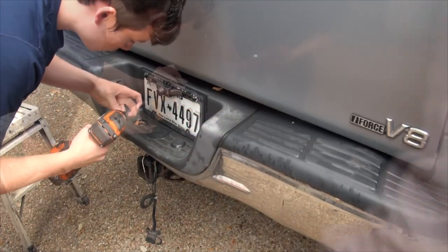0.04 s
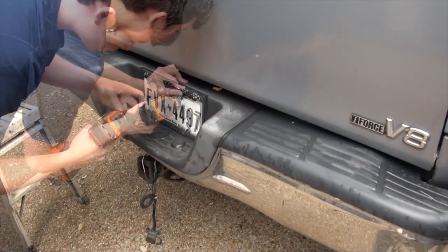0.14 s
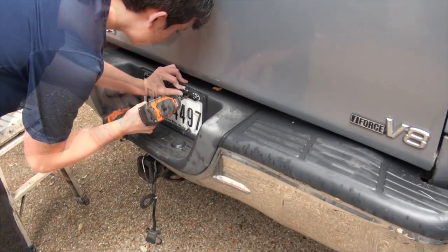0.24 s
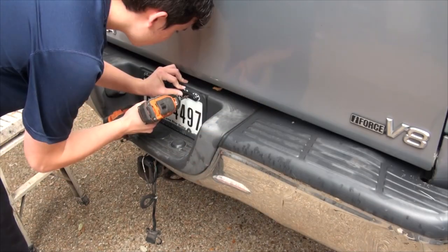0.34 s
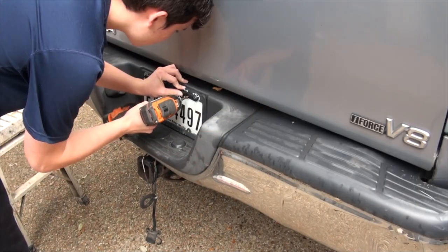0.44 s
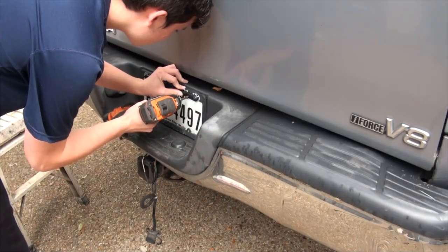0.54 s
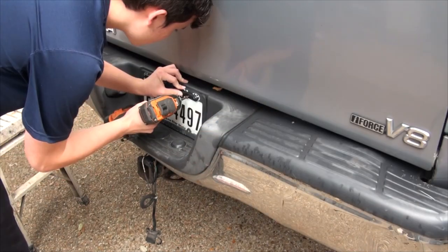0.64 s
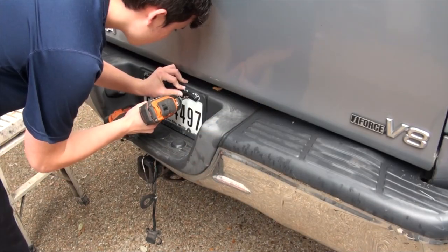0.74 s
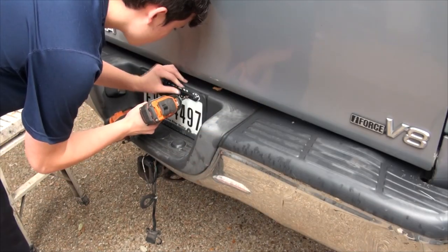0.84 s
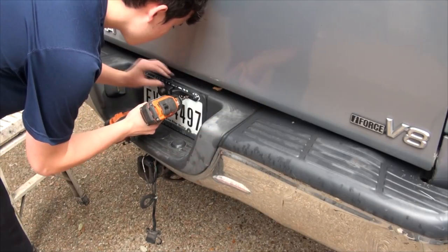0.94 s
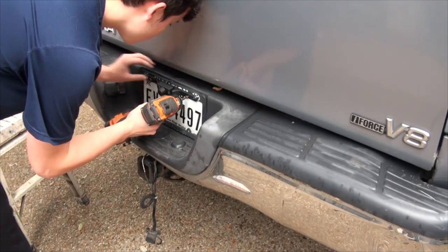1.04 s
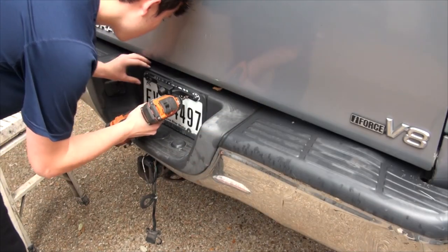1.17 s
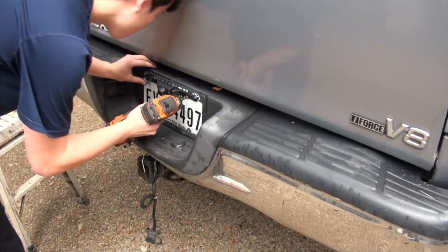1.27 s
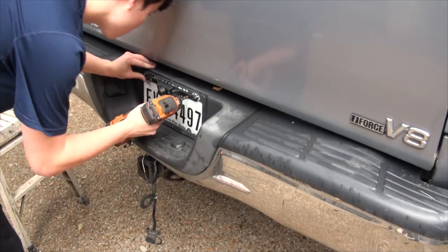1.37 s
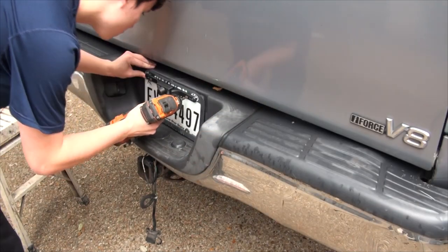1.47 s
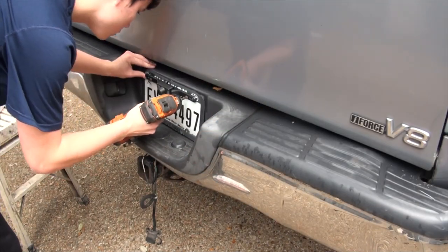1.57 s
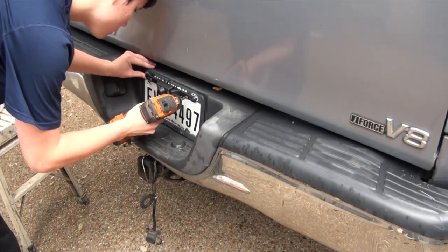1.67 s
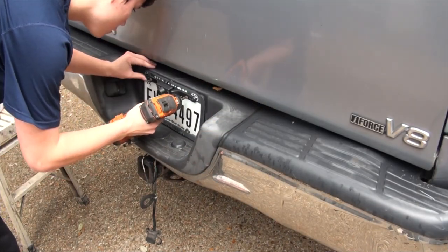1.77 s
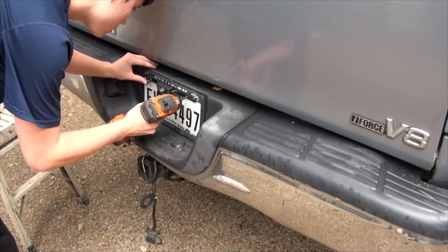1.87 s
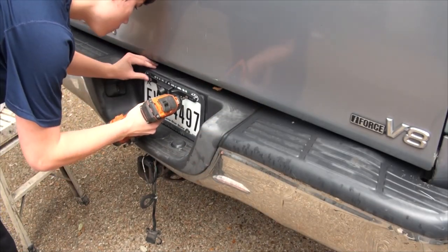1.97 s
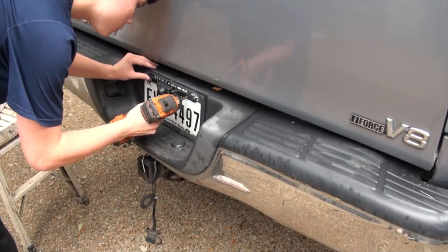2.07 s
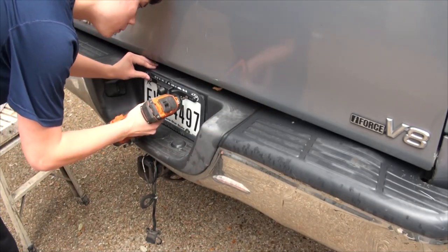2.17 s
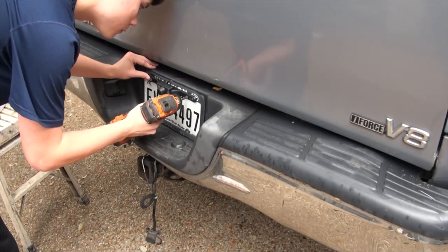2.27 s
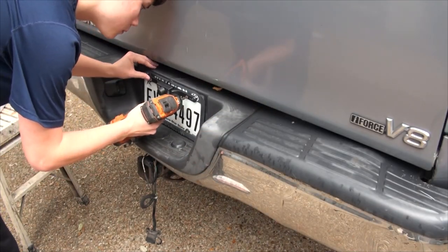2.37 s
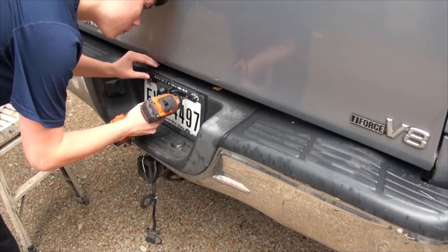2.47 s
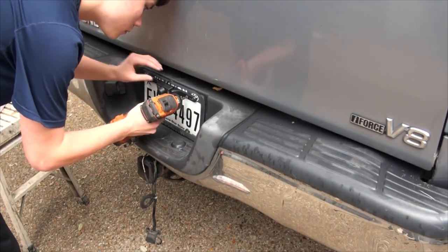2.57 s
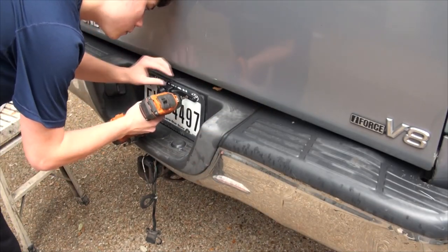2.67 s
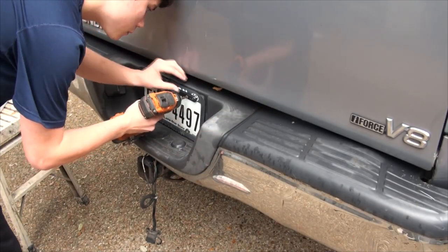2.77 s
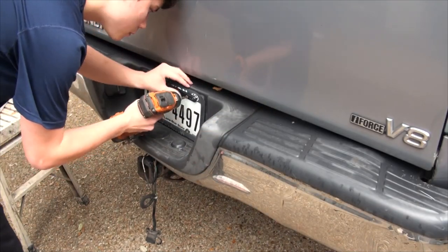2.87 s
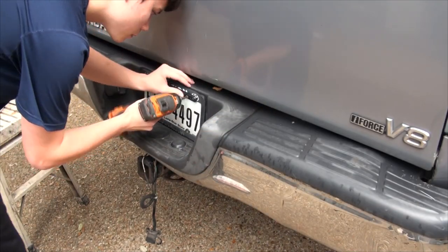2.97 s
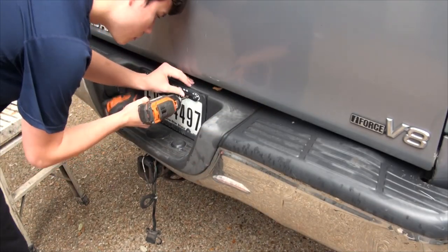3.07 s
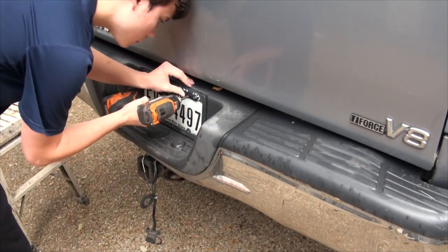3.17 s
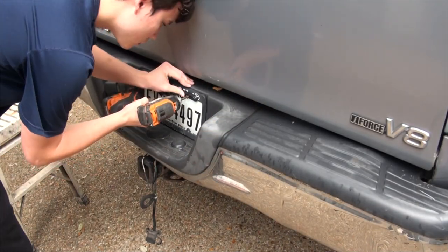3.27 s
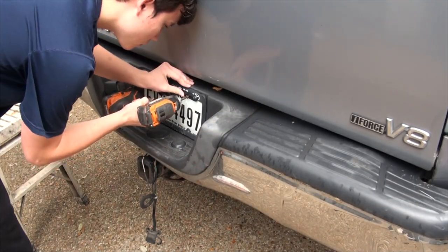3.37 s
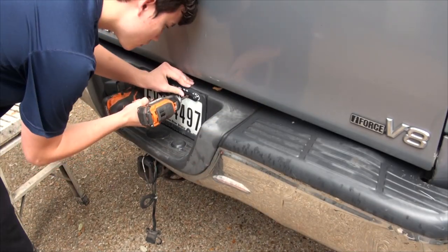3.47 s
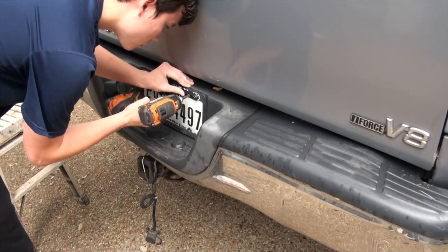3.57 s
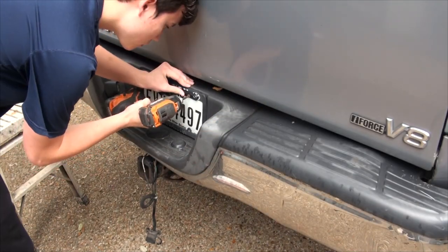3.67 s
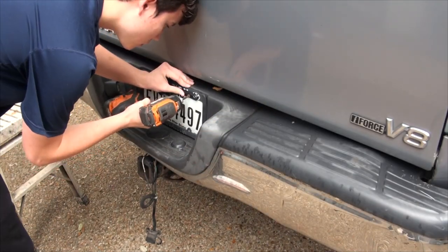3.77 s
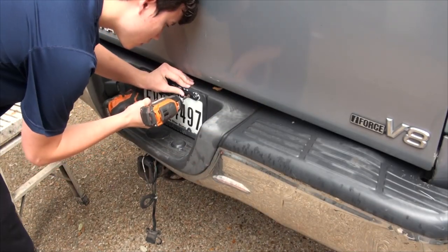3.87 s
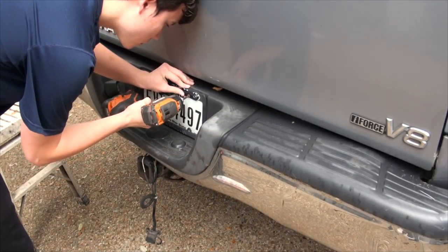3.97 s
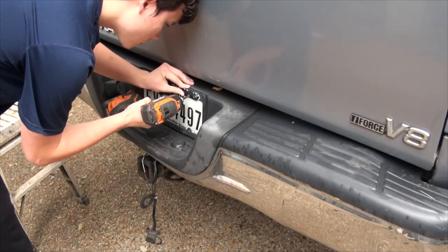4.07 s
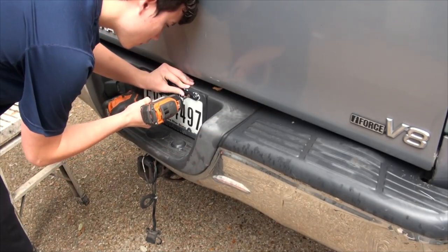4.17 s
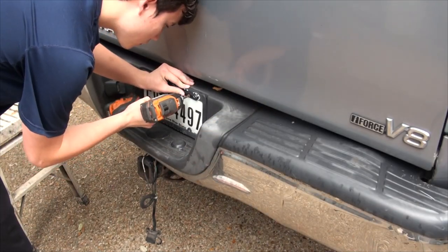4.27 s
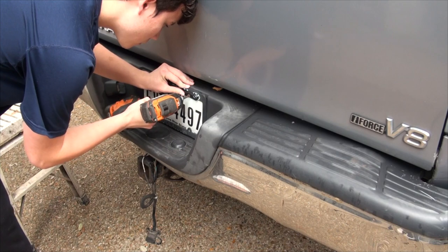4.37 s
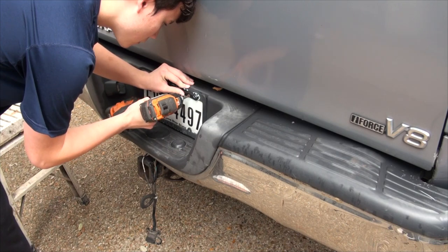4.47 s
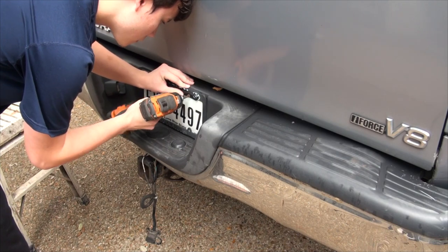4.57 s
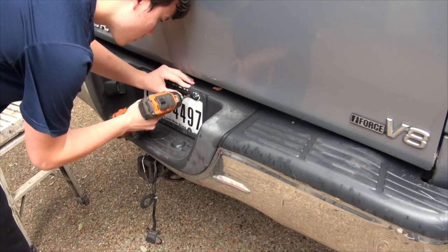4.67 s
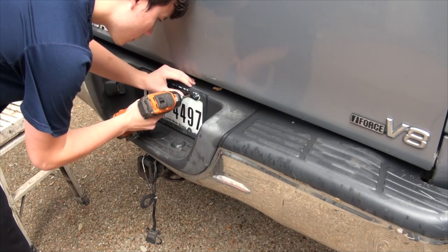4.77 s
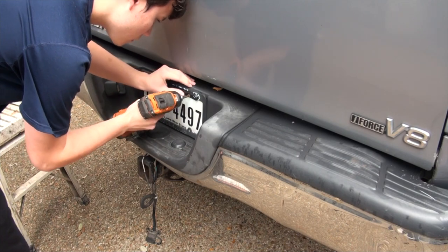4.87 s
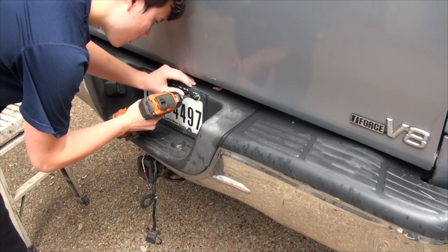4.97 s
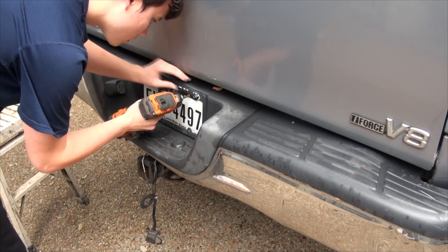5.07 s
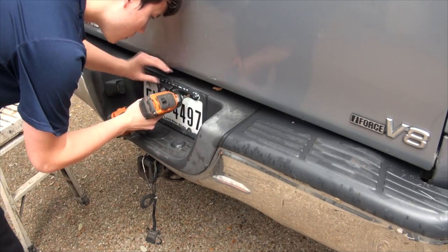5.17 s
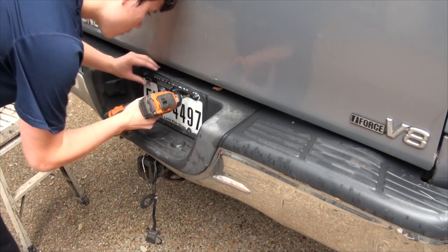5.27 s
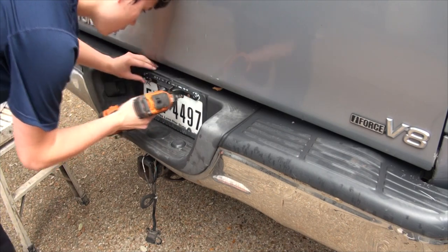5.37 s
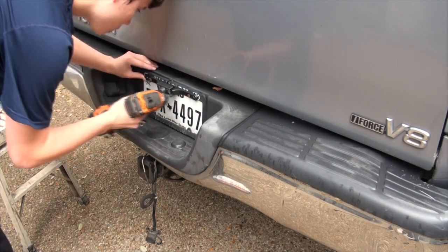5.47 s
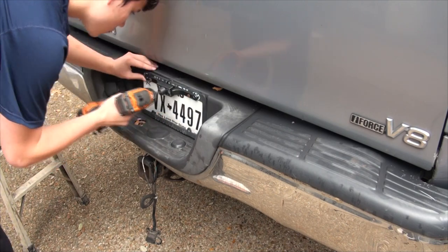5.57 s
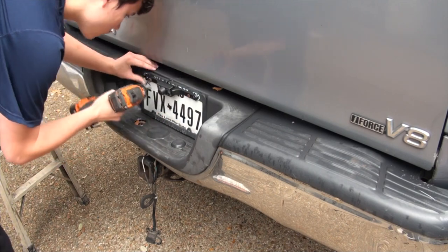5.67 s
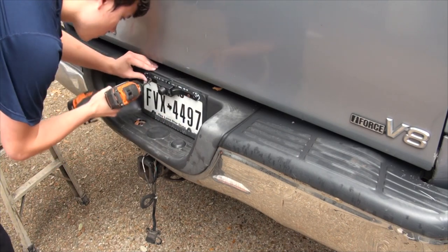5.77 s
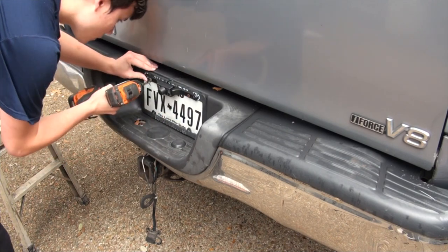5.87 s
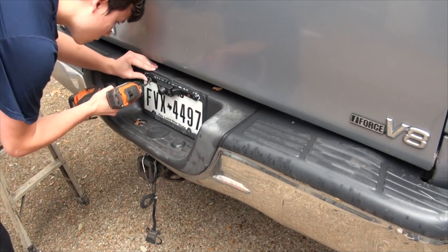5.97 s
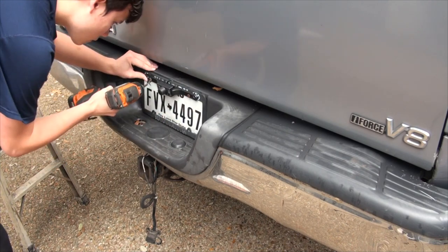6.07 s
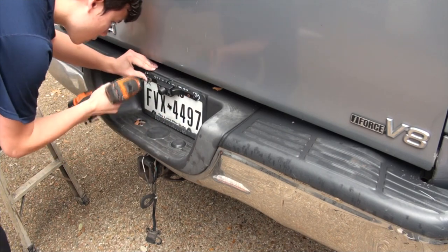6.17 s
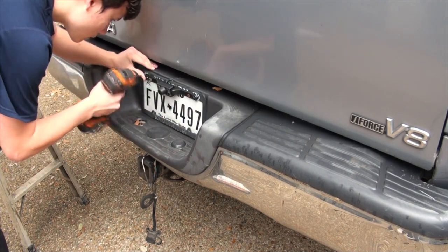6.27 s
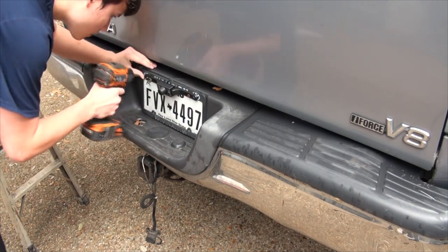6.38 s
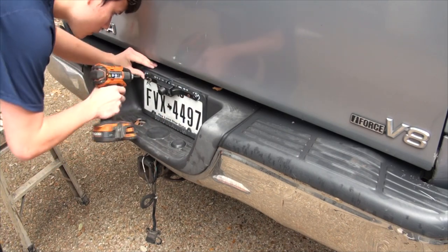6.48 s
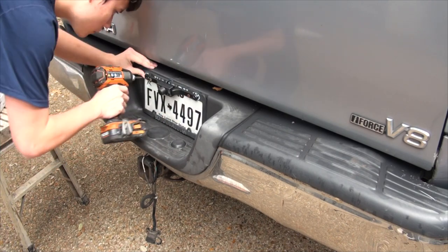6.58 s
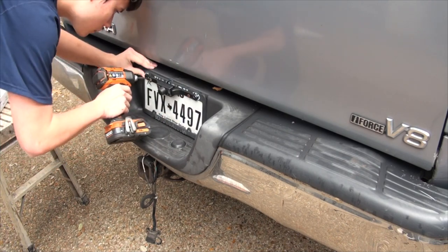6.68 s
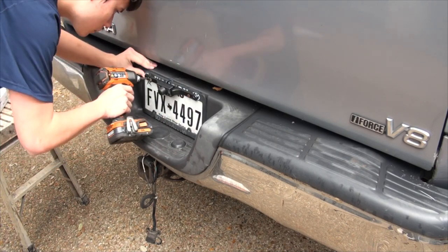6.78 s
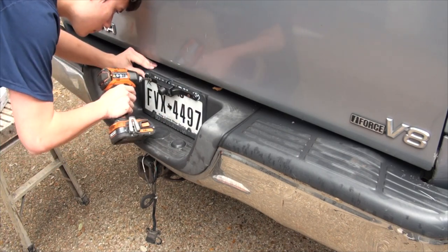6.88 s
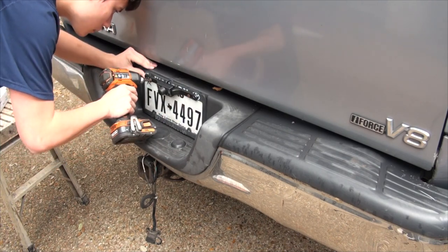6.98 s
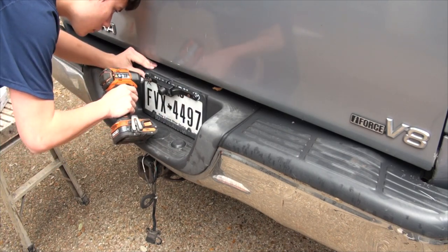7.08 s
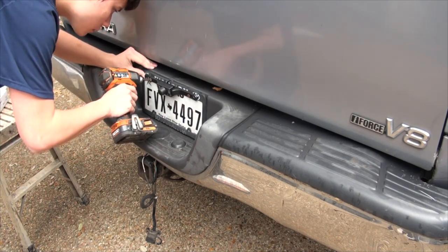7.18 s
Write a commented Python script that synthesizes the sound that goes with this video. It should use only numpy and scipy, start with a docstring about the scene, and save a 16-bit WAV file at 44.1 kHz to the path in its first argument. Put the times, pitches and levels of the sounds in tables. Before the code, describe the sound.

Brief rattling power-driver bursts and hard metallic cracks, close up, separated by pauses of low traffic rumble and a thin distant bird.

```python
"""A cordless driver runs in short bursts against a steel tailgate outdoors, close to two microphones.
Its gear teeth are shocks that shake noise through housing and panel resonances; brushes and fan hiss.
The speed control whines in steady partials; trigger clicks and bit knocks are short noise bursts.
A far bird is swooping sines with a burr, sleeves are swelling noise, and far traffic is shaped noise."""
import sys
import numpy as np
from scipy import signal
from scipy.fft import rfft, irfft, next_fast_len
from scipy.io import wavfile
from scipy.ndimage import uniform_filter1d

SR = 44100
rng = np.random.default_rng(int(sys.argv[2]) if len(sys.argv) > 2 else 0)


def dump_mix(stems):
    """Bounce the given channels to the path in sys.argv[1] as a 16-bit WAV at rate SR."""
    frames = np.atleast_2d(stems).T  # one column per channel
    limited = np.clip(frames, -1, 1)  # hard clip at full scale
    pcm = np.round(limited * 32767).astype(np.int16)
    wavfile.write(sys.argv[1], SR, pcm)


N = 318402

# Far traffic and leaves, spectrum: f/Hz, relative level per Hz/dB
AIR_SPECTRUM = [(20, -30), (41, -0.5), (110, 0), (150, -4), (300, -10.5), (640, -12), (900, -14.5),
                (4000, -25), (12000, -35), (16000, -39)]
# Slow swell of that bed: t/s, level/dB relative to AIR_DB
AIR_SWELL = [(0, 5.5), (1.2, 1.5), (2, 0), (4, 1.5), (7.22, 1.5)]
# Likeness of the bed on the two sides: f/Hz, correlation/1
AIR_CORRELATION = [(60, 0.68), (130, 0.84), (290, 0.21), (1400, 0.52), (15000, 0.13)]
# Bird phrases of three notes: start t/s, level/dB
BIRD_PHRASES = [(-.17, -64), (1.43, -56), (3.45, -62.5), (5.341, -56)]
# Notes of a phrase: delay t/s, landing pitch f/Hz, relative level/dB, share of the full swoop/1
BIRD_NOTES = [(.005, 7000, -2, 1.1), (.17, 6780, 2, 0.48), (.33, 6570, -6, 0.54)]
# A faint, very high squeak, pitch: t/s, f/Hz
SQUEAK_PITCH = [(2.8, 10800), (2.9, 11900), (2.98, 12000), (3.06, 10900)]
# The squeak's level: t/s, level/dB
SQUEAK_LEVEL = [(2.78, -100), (2.819, -70), (2.95, -78), (2.98, -68), (3.05, -72), (3.08, -100)]
# Moves of sleeves and hands: middle t/s, level/dB, half length t/s
RUSTLES = [(0.013, -44.5, 0.056), (0.093, -45.5, 0.021), (0.922, -49.5, 0.035), (1.191, -49, 0.064),
           (1.334, -50, 0.038), (1.439, -51, 0.058), (2.928, -57, 0.036), (3.025, -57, 0.06),
           (5.12, -54.5, 0.05), (5.324, -57, 0.11), (6.393, -53, 0.094), (7.22, -52.5, 0.02)]
# Cloth spectrum: f/Hz, relative level per Hz/dB
CLOTH_SPECTRUM = [(300, 4), (1500, 2.5), (5000, -6), (11000, -8), (16000, -27)]
# Trigger switch snaps: t/s, nominal peak level/dB
TRIGGER_CLICKS = [(0.307, -36), (0.3157, -19), (2.278, -21), (3.4927, -18), (4.2292, -19.5)]
# Switch spectrum: f/Hz, relative level per Hz/dB
SWITCH_SPECTRUM = [(880, -31), (1500, -7.5), (2830, 0), (6500, -3), (10000, -5), (13500, -7),
                   (16000, -20.5)]
# Speed control at part throttle: start t/s, end t/s, start level/dB, end level/dB,
# odd partials' relative level/dB
WHINE_SPANS = [(0.324, 0.423, -40.5, -37, 1), (2.333, 2.453, -30, -37, -7),
               (3.554, 3.593, -46, -23.5, -13.5)]
# Whine partials: f/Hz, relative level/dB
WHINE_PARTIALS = [(1933, -7), (3866, 0), (5799, -16)]
# Driver bursts: trigger pulls, and at 1.514 and 3.117 s the bit slipping and clattering:
# start t/s, free run t/s, loaded hold t/s, coast-down t/s,
# free rattle level/dB, loaded rattle level/dB, coast-down rate/(dB per s),
# loaded panel rumble relative level/dB, brush and fan hiss relative level/dB
DRIVER_BURSTS = [(0.353, 0.078, 0.071, 0.07, -28, -28, 230, 2, -9.5),
                 (1.514, .02, 0.0094, .08, -23, -26, 240, 3, -6),
                 (2.333, 0.071, 0.029, 0.094, -33, -31, 239, 0, -14),
                 (3.117, 0.056, .02, 0.047, -43, -38, 241.5, 8, -15),
                 (3.552, .085, .03, .1, -27.5, -23, 171.5, 0.5, -13),
                 (4.285, 0.046, .07, 0.069, -32, -23.5, 221.5, -6.5, -8.5)]
# Resonances of the driver housing: f/Hz, width f/Hz, relative level/dB
HOUSING_MODES = [(1560, 470, -22), (2346, 800, 3.5), (3160, 630, -1), (3850, 980, 5.5), (4590, 180, -9),
                 (5050, 120, -15.5)]
# Brush and fan hiss spectrum: f/Hz, relative level per Hz/dB
BRUSH_SPECTRUM = [(4000, -38.5), (6000, 4), (9000, 13.5), (11600, 2.5), (14500, -17), (16000, -55)]
# Bit, screw and plate strikes: t/s, nominal crack peak level/dB, panel thud relative level/dB,
# treble of the crack relative level/dB
KNOCK_HITS = [(0.364, -27, -10, 6), (0.4379, -4, -4, 0), (0.4888, -5, -4, 3), (0.5355, -1.5, -12, 2),
              (0.8804, -31.5, -2, 14.5), (1.474, -27.5, 1, -10), (1.5175, -3, -7.5, 12),
              (1.561, -12, -7.5, 12), (1.589, -16.5, -4.5, 10.5), (1.601, -13, -11, 6.5),
              (1.672, -28, -6, 0), (1.7326, -37, -3.5, 14), (1.8392, -23.5, -2, -10), (2.159, -38, -14, -3),
              (2.3384, -10.5, -19, 8.5), (2.4084, -9, -19.5, -6.5), (2.4841, -13, -7, 3.5),
              (2.5374, -23, -7, 0), (3.0006, -43, 11, -9), (3.122, -26.5, -2, 2.5), (3.126, -17, -8, 5),
              (3.1385, -23.5, -1.5, 6), (3.1757, -11, -2, 5.5), (3.224, -27.5, -7, 7), (3.2511, -22, -7, 2),
              (3.5642, -22, -16, -0.5), (3.6382, -1, -12, 7), (3.7295, -29, -14, 0), (3.7493, -30, -8, -1),
              (3.76, -33, -5.5, -8), (4.2885, -10, -16.5, 4.5), (4.3209, -5, 2, -3),
              (4.4339, -0.5, -13, -1), (4.8183, -19, -2.5, -11), (5.3333, -33, -7, -8),
              (5.6886, -41, -10, 15), (5.808, -40, -5, 7), (5.9655, -22.5, 3, -21), (5.995, -40, -12, -13),
              (6.5598, -47.5, 12, -8), (6.6424, -5, -5, 3)]
# Crack spectrum: f/Hz, relative level per Hz/dB
CRACK_SPECTRUM = [(530, -29), (900, -17), (2760, 5), (3260, 1), (3910, -2), (11600, -13.5), (16000, -57)]
# Resonances of tailgate and plate: f/Hz, width f/Hz, relative level/dB
PANEL_MODES = [(96.5, 34, -11), (168.7, 31.5, -5.5), (225.6, 55, -3), (389, 124, -2), (473, 88, -1),
               (601.6, 47.4, 2.5), (757, 130, -5.5), (1000, 130, -6.5), (1114, 68, -3.5), (1490, 410, -10)]
# Stereo balance, the left side lacking bass, for near sound: f/Hz, left minus right level/dB
NEAR_BALANCE = [(60, -10), (110, -24), (200, -18.5), (380, -8.5), (700, -4.5), (1290, -2.5), (2380, -3),
                (4400, -4), (8120, -6.5), (15000, -0.5)]
# The same for far sound: f/Hz, left minus right level/dB
FAR_BALANCE = [(60, -23), (110, -18.5), (200, -16.5), (380, -3.5), (700, -0.5), (1290, 5), (2380, 4),
               (4400, 1.0), (8120, 2), (15000, -12)]

AIR_DB = -48
NOTE_S, SWOOP_HZ, SWOOP_S = .14, 993, .035  # note length, full swoop, its time constant
TREES_DB, TREES_T60_S = -0.5, 0.94
SWITCH_T60_S, CRACK_T60_S = .022, 0.043
SPIN_UP_S, SPIN_UP_DB = .018, -10  # the rattle starts this far under its running level
FREE_RUMBLE_DB, BITE_S = -10, .03  # panel against rattle before the bit bites; time the bite takes
PANEL_FALL_DB_PER_S = 159  # decay rate of the panel rumble after the hold
# The fan needs speed: its hiss comes late and goes early (HISS_COAST multiplies the coast-down rate).
HISS_RISE_S, HISS_RISE_DB, HISS_COAST = 0.056, -17, 1.6
HALT_DB_PER_S = 902.5  # extra fall once the coast-down is over
FREE_TILT_DB_PER_OCT, TILT_HZ = 4, 3530  # the unloaded gears sound thinner
TREBLE_HZ = 5740  # body and treble of a crack part here
YARD_DB, YARD_T60_S, YARD_TOP_HZ, YARD_ALIKE = -13.5, .19, 4820, 0.46
TOP_HZ = 16000
T = np.arange(N) / SR  # time in s
M = 2 * next_fast_len(N // 2 + SR // 8)  # padded transform length in samples
F = np.maximum(np.arange(M // 2 + 1) * SR / M, 1.)  # frequency in Hz


def undb(db):
    """Turns dB into gain."""
    return 10 ** (np.asarray(db) / 20)


def unit(x):
    """Levels a signal to rms 1."""
    return x / np.sqrt(np.mean(x ** 2))


def along_hz(table):
    """Reads an (f/Hz, value) table at every frequency, on a log scale."""
    hz, value = np.transpose(table)
    return np.interp(np.log(F), np.log(np.maximum(hz, 1)), value)


def along_s(table):
    """Reads a (t/s, value) table at every moment."""
    return np.interp(T, *np.transpose(table))


def apply_response(x, response):
    """Filters in the frequency domain; white input keeps its rms."""
    gain = np.sqrt(np.mean(np.abs(response) ** 2))
    return irfft(rfft(x, M) * response / gain, M)[:N]


def colour(x, spectrum):
    """Gives a sound the spectrum's shape with a causal, minimum-phase filter."""
    cepstrum = irfft(np.log(undb(along_hz(spectrum))), M)
    # folding the cepstrum onto positive time makes the filter causal
    cepstrum[1:M // 2] *= 2
    cepstrum[M // 2 + 1:] = 0
    return apply_response(x, np.exp(rfft(cepstrum)))


def ring(x, modes):
    """Excites resonances side by side, with alternating signs."""
    response = 0
    for k, (hz, width, db) in enumerate(modes):
        response = response + undb(db) * (-1) ** k / (1 + 1j * (F - hz * hz / F) / width)
    return apply_response(x, response)


def walk(rate):
    """Wanders at rms 1: random levels, a new one rate times a second, slewed together."""
    hold = int(SR / rate)
    steps = np.repeat(rng.standard_normal(N // hold + 1), hold)
    return unit(uniform_filter1d(steps, hold)[:N])


def bursts(s, db, t60, rise_s):
    """Noise that rises at each moment and dies away exponentially."""
    envelope = np.zeros(N)
    for start, gain in zip(s, undb(db)):
        first = int(start * SR)
        age = np.maximum(T[first:int((start + 1.5 * t60) * SR)] - start, 0)
        envelope[first:first + len(age)] += gain * np.minimum(age / rise_s, 1) * 1000 ** (-age / t60)
    return envelope * rng.standard_normal(N)


def air():
    """Far traffic and leaves: noise whose likeness on the two sides depends on frequency."""
    alike = np.clip(along_hz(AIR_CORRELATION), 0, .99)
    a, b = (rfft(colour(rng.standard_normal(N), AIR_SPECTRUM), M) for _ in range(2))
    left = alike * a + np.sqrt(1 - alike ** 2) * b
    pair = irfft(np.array([left, a]), M)[:, :N]
    return pair * undb(AIR_DB + along_s(AIR_SWELL))


def bird(burr_hz=80):
    """Thin notes with a burr, each swooping down onto its pitch, and a squeak; the trees smear them."""
    burr, flutter = burr_hz * walk(250), undb(2.2 * walk(70))
    squeak_phase = 2 * np.pi * np.cumsum(along_s(SQUEAK_PITCH) + 3 * burr) / SR
    song = undb(along_s(SQUEAK_LEVEL)) * np.sin(squeak_phase)
    for start, db in BIRD_PHRASES:
        for after, hz, note_db, swoop in BIRD_NOTES:
            at = (T > start + after) & (T < start + after + NOTE_S)
            age = T[at] - start - after
            pitch = hz + SWOOP_HZ * swoop * np.exp(-age / SWOOP_S) + burr[at]
            swell = np.sin(np.pi * age / NOTE_S)
            song[at] += undb(db + note_db) * swell * np.sin(2 * np.pi * np.cumsum(pitch) / SR)
    song = np.sqrt(2) * flutter * song
    echo = rng.standard_normal(SR // 2) * 1000 ** (-T[:SR // 2] / TREES_T60_S)
    echo = echo / np.sqrt(np.sum(echo ** 2))
    return song + undb(TREES_DB) * signal.fftconvolve(song, echo)[:N]


def rustle():
    """Cloth sliding: patchy noise that swells and fades with each move."""
    cloth = colour(rng.standard_normal(N) * undb(2.6 * walk(83)), CLOTH_SPECTRUM)
    swells = sum(undb(db) * np.exp(-((T - middle) / half) ** 2) for middle, db, half in RUSTLES)
    return unit(cloth) * swells


def trigger(crest_db=6):
    """The switch snaps inside the grip: short coloured noise bursts."""
    s, db = np.transpose(TRIGGER_CLICKS)
    return colour(bursts(s, db - crest_db, SWITCH_T60_S, 0.0027), SWITCH_SPECTRUM)


def whine():
    """The chopped motor current sings fixed partials whose shared level wavers at random."""
    out = 0
    for start, end, start_db, end_db, odd_db in WHINE_SPANS:
        level = undb(np.interp(T, [start, end], [start_db, end_db]))
        gate = uniform_filter1d(level * ((T > start) & (T < end)), size=80)
        for k, (hz, db) in enumerate(WHINE_PARTIALS):
            gain = undb(db + odd_db * (k % 2 == 0))  # k counts from 0, so even k is an odd partial
            out = out + gate * gain * np.sqrt(2) * np.sin(2 * np.pi * hz * T)
    return out * undb(3.5 * walk(200))


def burst_levels():
    """Rattle, rumble and hiss in dB, and load 0-1, of each burst: rise, free part, loaded part, fall."""
    levels, load = np.full((3, N), -120.), np.zeros(N)
    for start, free_s, hold_s, coast_s, free_db, load_db, coast, rumble_db, hiss_db in DRIVER_BURSTS:
        at = slice(int(start * SR), int((start + .6) * SR))
        age = T[at] - start
        bite = np.clip((age - free_s) / BITE_S + 1, 0, 1)  # complete as the free run ends
        spin_up = SPIN_UP_DB * np.clip(1 - age / SPIN_UP_S, 0, 1)
        running = free_db + (load_db - free_db) * bite + spin_up
        after = np.maximum(age - free_s - hold_s, 0)
        halt = HALT_DB_PER_S * np.maximum(after - coast_s, 0)
        rattle = running - coast * after - halt
        rumble_offset = FREE_RUMBLE_DB + (rumble_db - FREE_RUMBLE_DB) * bite
        rumble = running + rumble_offset - PANEL_FALL_DB_PER_S * after
        hiss_rise = HISS_RISE_DB * np.clip(1 - age / HISS_RISE_S, 0, 1)
        hiss = running + hiss_db + hiss_rise - HISS_COAST * coast * after - halt
        levels[:, at] = np.maximum(levels[:, at], [rattle, rumble, hiss])
        load[at] = np.maximum(load[at], bite)
    return *levels, load


def gears(teeth_per_s=350, scatter_db=3.0, knock_s=0.0019, grind_db=-9, fan_db=-3, push_s=0.0059):
    """Teeth knock unevenly in the housing over a fine grind; their shocks drive the panel down the bit."""
    rattle_db, rumble_db, hiss_db, load = burst_levels()
    speed = np.clip(1 + (rattle_db + 22) / 25, .15, 1)  # the louder the rattle, the faster the motor
    phase = np.cumsum(teeth_per_s * speed * undb(2.0 * walk(300))) / SR
    contacts = np.diff(np.floor(phase), prepend=0) > 0
    teeth = contacts * undb(scatter_db * rng.standard_normal(N)) / np.sqrt(speed)

    def decaying(tau):
        """Lets every tooth contact die away over tau seconds, at rms 1 while running."""
        x = signal.lfilter([1], [1, -np.exp(-1 / (tau * SR))], teeth)
        return x / np.sqrt(np.mean(x[rattle_db > -55] ** 2))

    shocks, pushes = decaying(knock_s), decaying(push_s)
    grinding = (shocks + undb(grind_db)) * rng.standard_normal(N)
    rattle = 0
    for mode in HOUSING_MODES:
        hz, _, db = mode
        tilt_db = FREE_TILT_DB_PER_OCT * np.log2(hz / TILT_HZ) * (1 - load)
        # the grip shifts, so each housing resonance comes and goes
        rattle = rattle + undb(db - 8.0 + 3.8 * walk(45) + tilt_db) * ring(grinding, [mode])
    rumble = ring(pushes * rng.standard_normal(N), PANEL_MODES)
    hiss = colour((shocks + undb(fan_db)) * rng.standard_normal(N), BRUSH_SPECTRUM)
    layers = (rattle_db, rattle), (rumble_db, rumble), (hiss_db, hiss)
    return sum(uniform_filter1d(undb(db), size=90) * x for db, x in layers)


def knocks(thud_t60_s=0.17, blow_db=14, crest_db=11, tick_db=3):
    """A crack at the contact; the panel takes one blow and then chatters on."""
    s, db, thud_db, treble_db = np.transpose(KNOCK_HITS)
    onset = (s * SR).astype(int)
    low, high = (signal.butter(2, TREBLE_HZ, kind, fs=SR) for kind in ("low", "high"))
    body = bursts(s, db - crest_db, CRACK_T60_S, 0.00078)
    treble = bursts(s, db + treble_db - crest_db, CRACK_T60_S, 0.003)
    crack = signal.lfilter(*low, body) + signal.lfilter(*high, treble)
    crack[onset + int(.002 * SR)] += undb(db + tick_db)  # a single-sample tick
    push = bursts(s, db + thud_db - crest_db, thud_t60_s, 0.00095)
    push[onset] += undb(db + thud_db + blow_db)
    return colour(crack, CRACK_SPECTRUM) + ring(push, PANEL_MODES)


def yard(near):
    """Dull reflections off ground and bumper: decaying noise echoes, partly shared by both sides."""
    age = T[:SR // 4]
    shared, left, right = rng.standard_normal((3, len(age)))
    alike = np.clip(YARD_ALIKE, 0, 1)
    echo = np.sqrt(alike) * shared + np.sqrt(1 - alike) * np.array([left, right])
    echo = echo * 1000 ** (-age / YARD_T60_S) * (age > .001)
    echo = signal.lfilter(*signal.butter(2, YARD_TOP_HZ, fs=SR), echo)
    echo = echo * undb(YARD_DB) / np.sqrt(np.sum(echo ** 2, axis=1, keepdims=True))
    return signal.fftconvolve(near[None], echo, axes=1)[:, :N]


def microphones(pair, balance):
    """Shares the sound between the two capsules by frequency."""
    ratio = undb(along_hz(balance))
    gains = np.array([2 * ratio, 2 + 0 * ratio]) / (1 + ratio)
    return irfft(rfft(pair, M) * gains, M)[:, :N]


def scene():
    """Mixes the near driver and sleeves, with yard reflections and dry whine, over the far bed and bird."""
    near = gears() + knocks() + trigger() + rustle()
    close = near + yard(near) + whine()
    return microphones(close, NEAR_BALANCE) + microphones(air() + bird(), FAR_BALANCE)


def record(dry, ceiling=0.64):
    """Rounds the loudest peaks by soft saturation and cuts the top with a steep low-pass."""
    rounded = ceiling * np.tanh(dry / ceiling)
    return signal.sosfilt(signal.ellip(12, .2, 110, TOP_HZ, fs=SR, output="sos"), rounded)


dry = scene()
out = record(dry)
dump_mix(out)
```